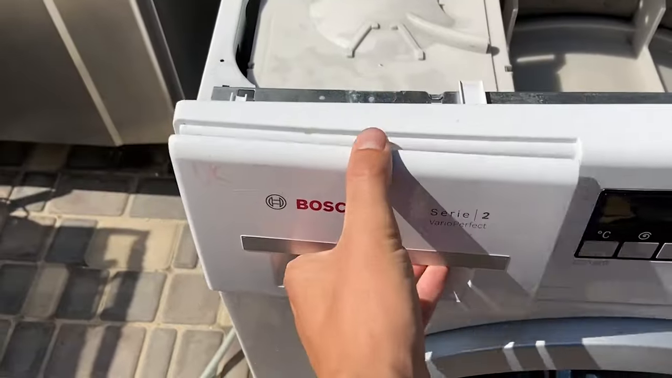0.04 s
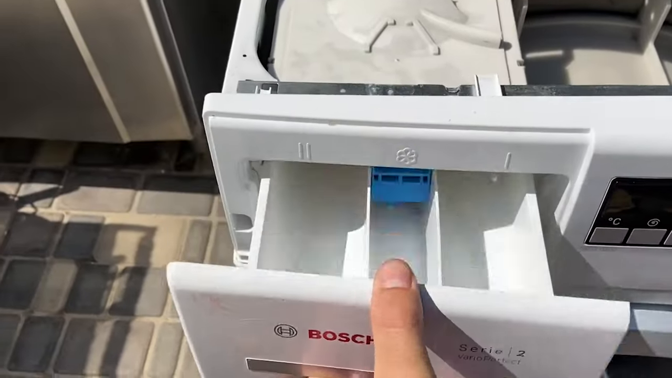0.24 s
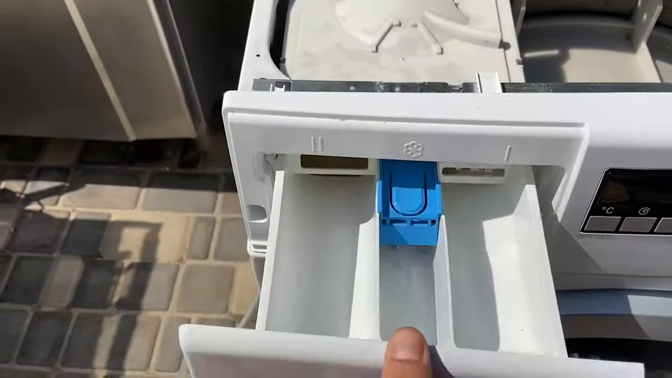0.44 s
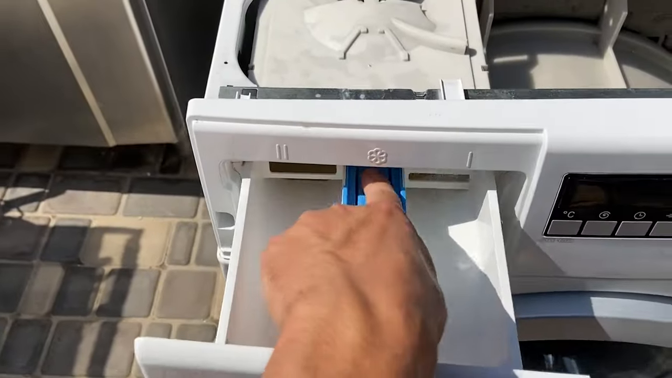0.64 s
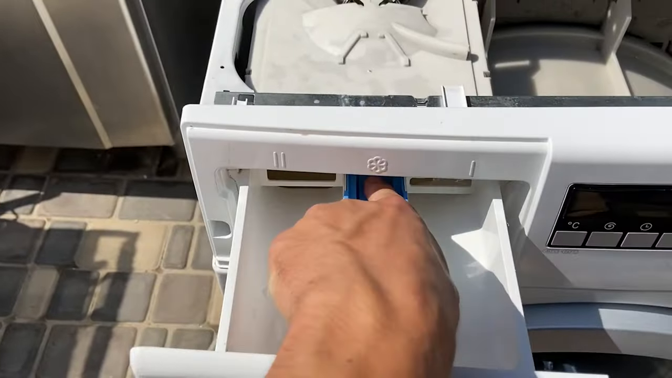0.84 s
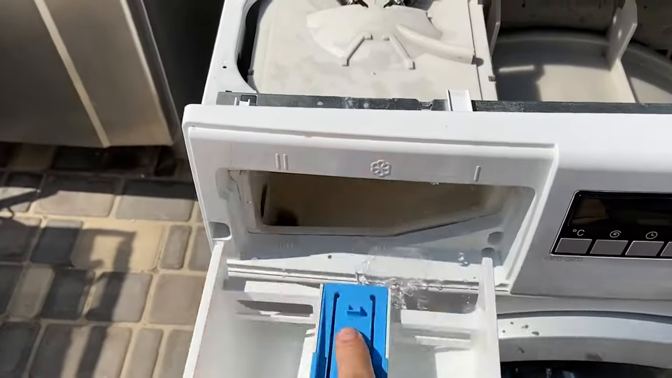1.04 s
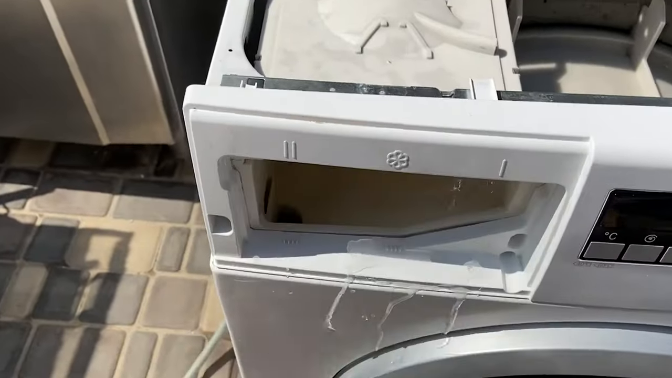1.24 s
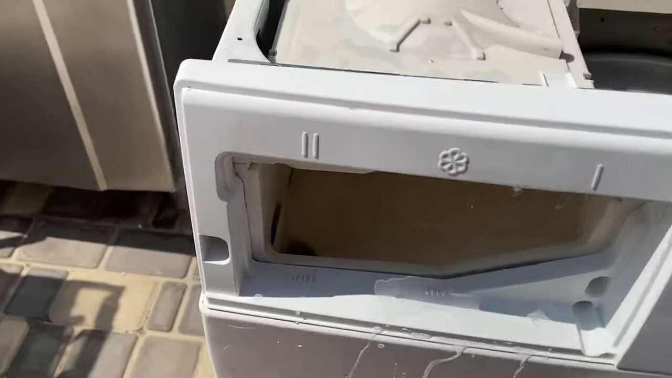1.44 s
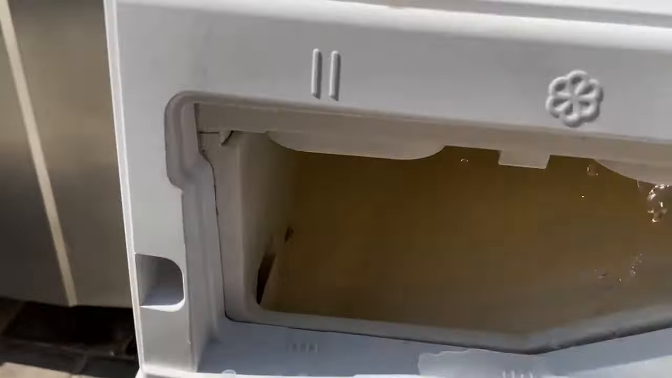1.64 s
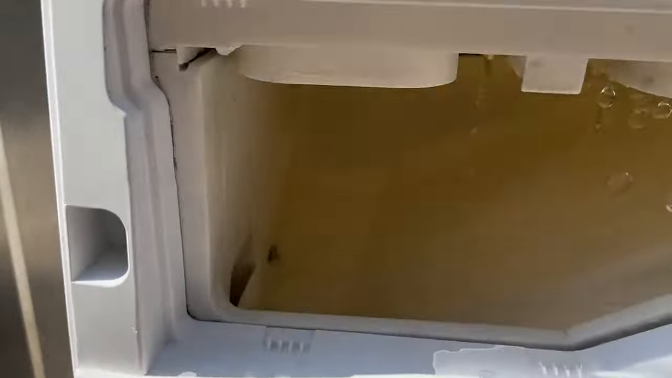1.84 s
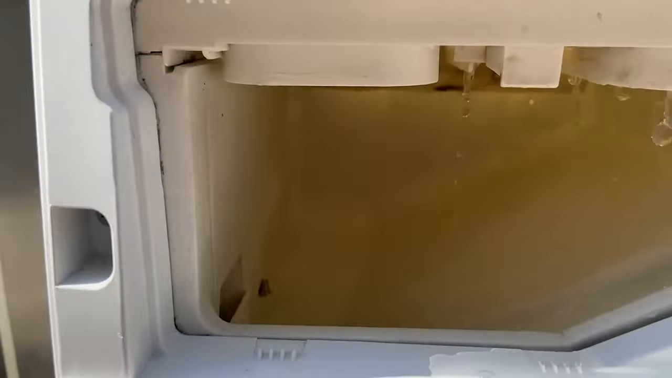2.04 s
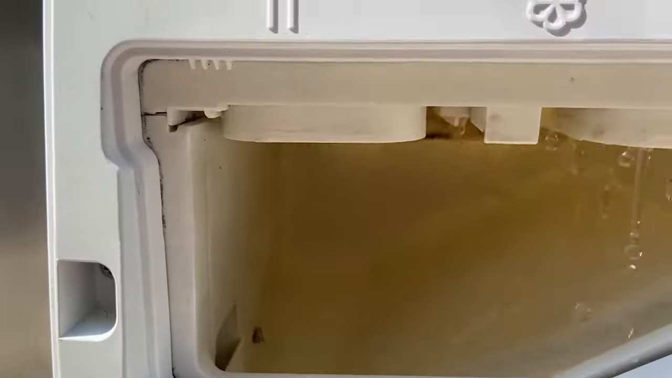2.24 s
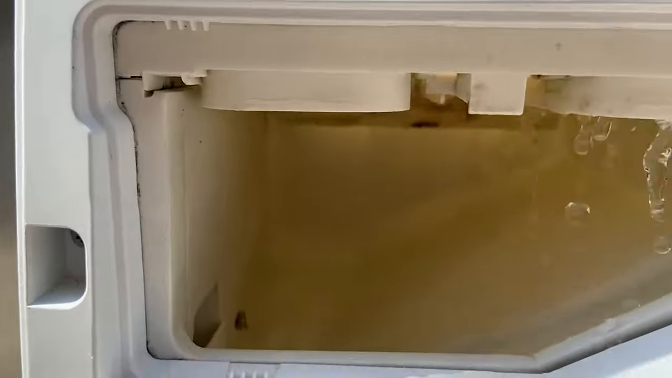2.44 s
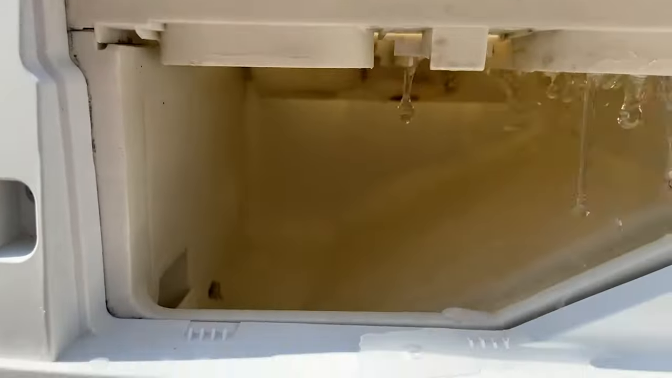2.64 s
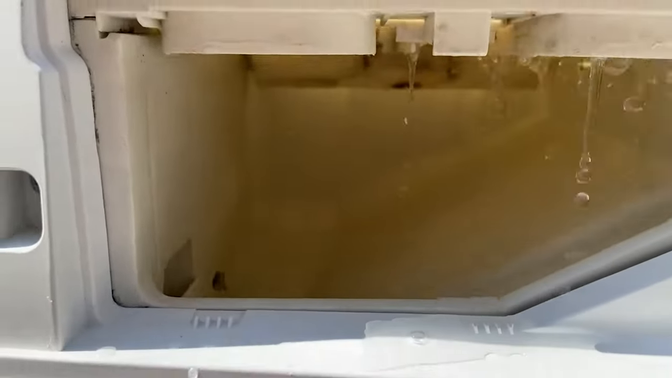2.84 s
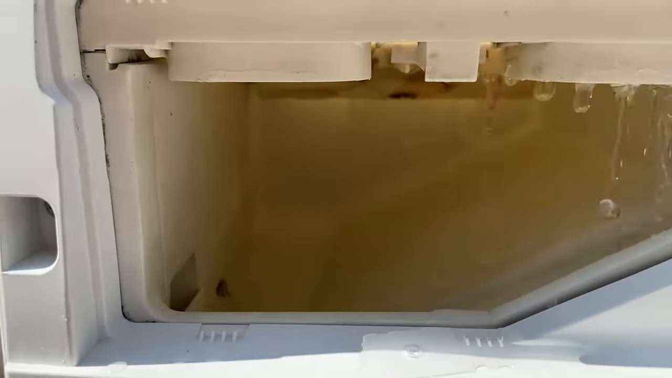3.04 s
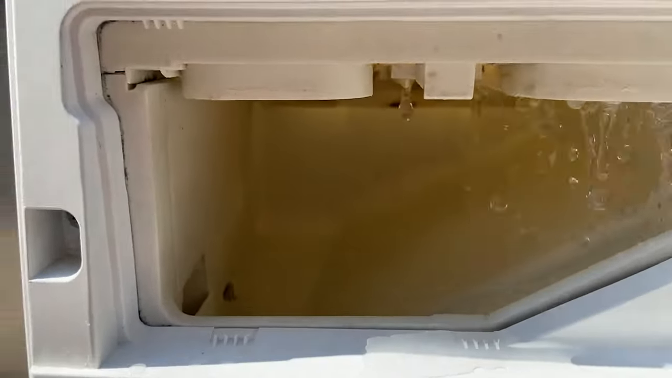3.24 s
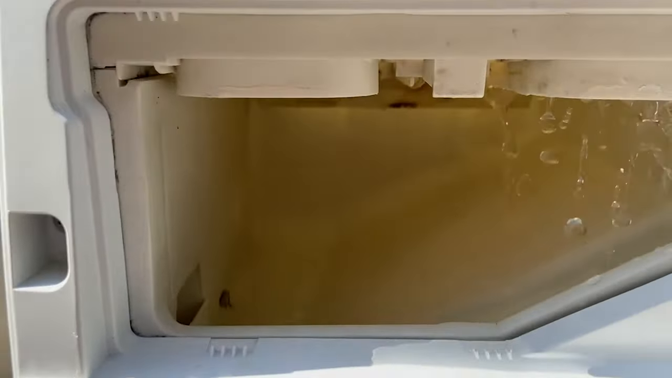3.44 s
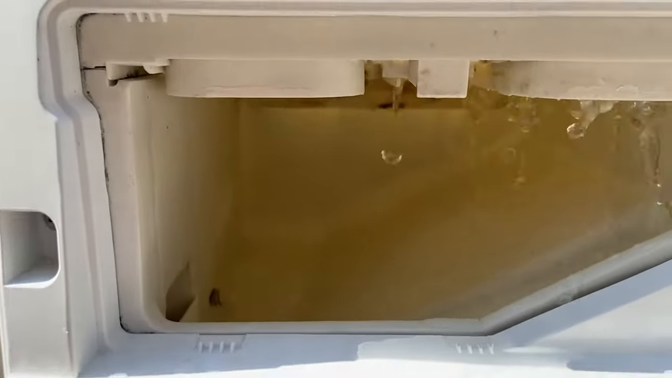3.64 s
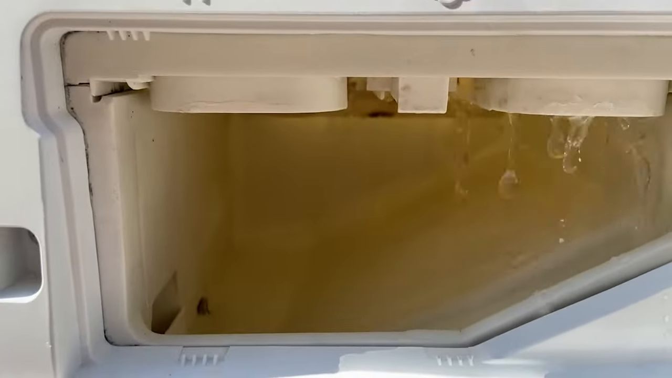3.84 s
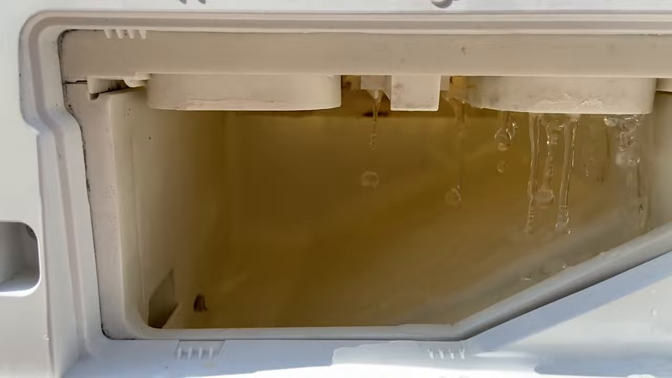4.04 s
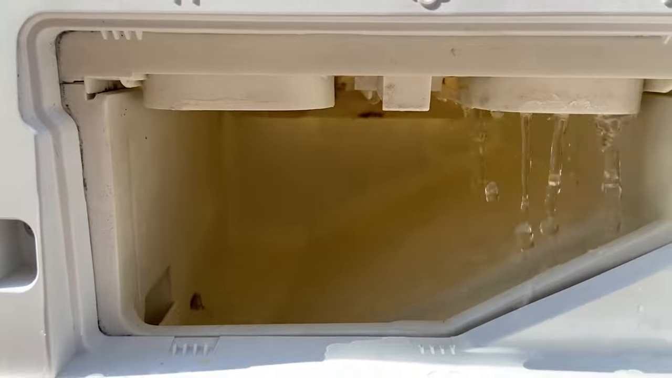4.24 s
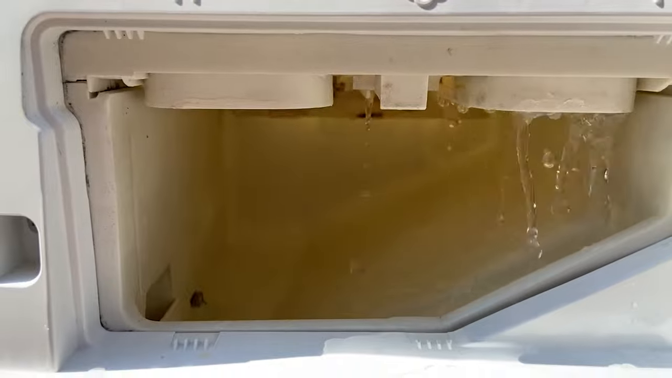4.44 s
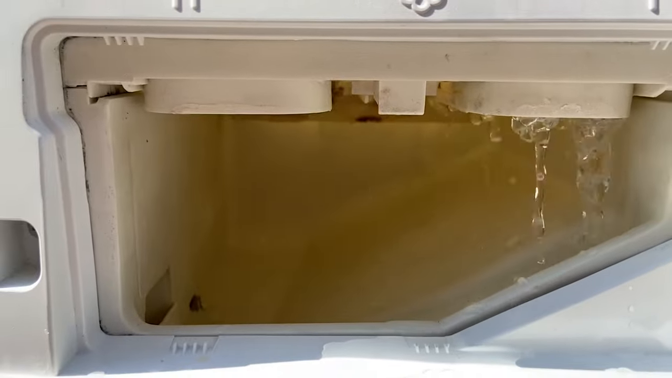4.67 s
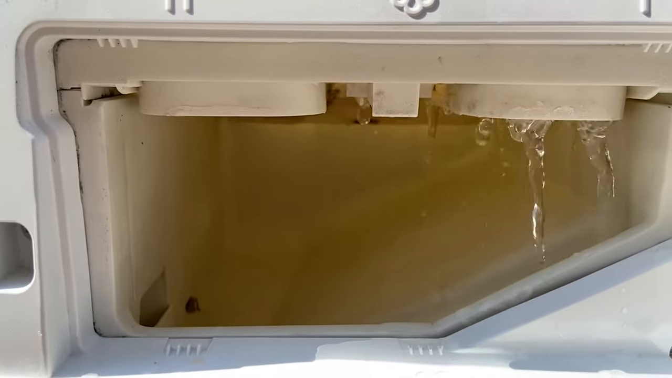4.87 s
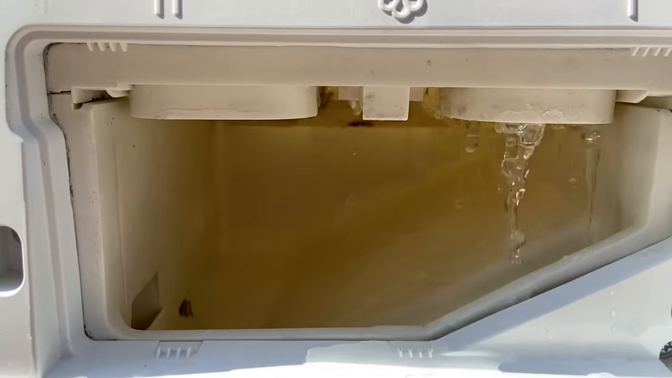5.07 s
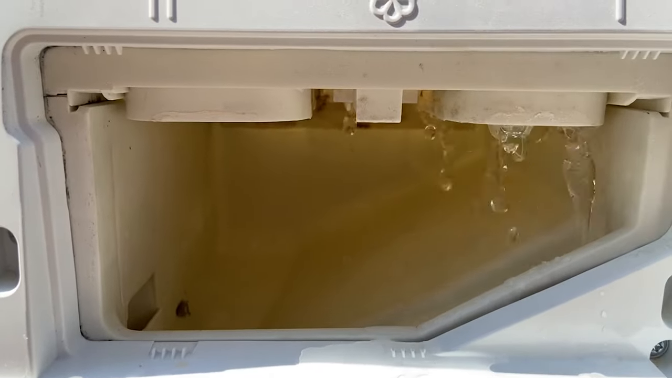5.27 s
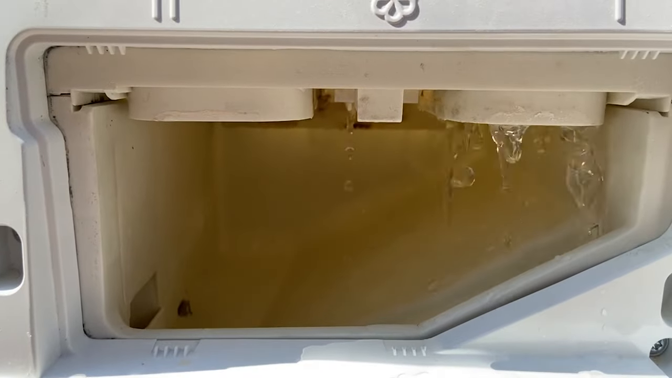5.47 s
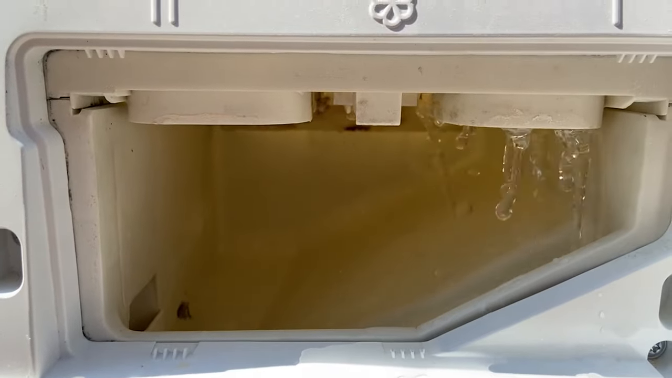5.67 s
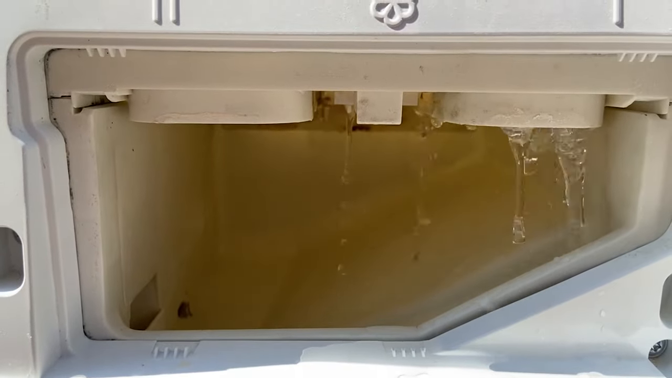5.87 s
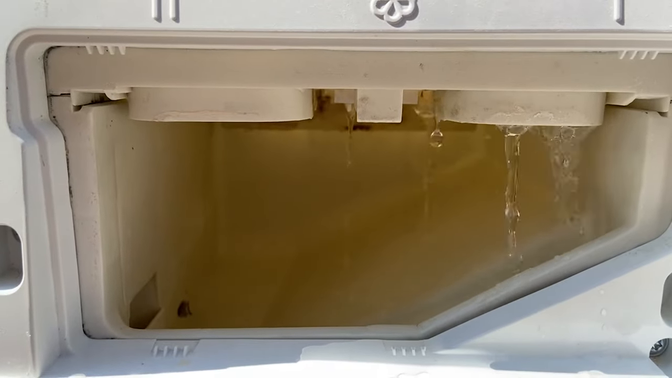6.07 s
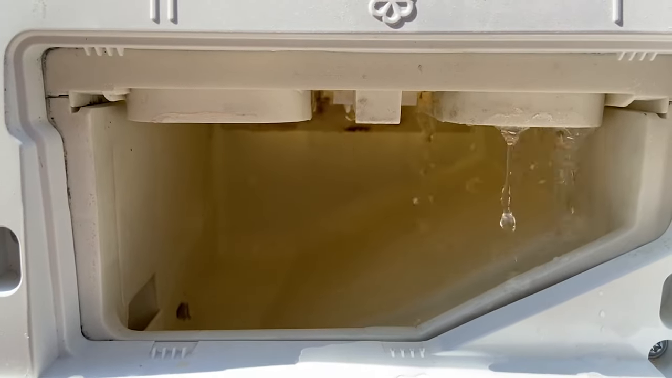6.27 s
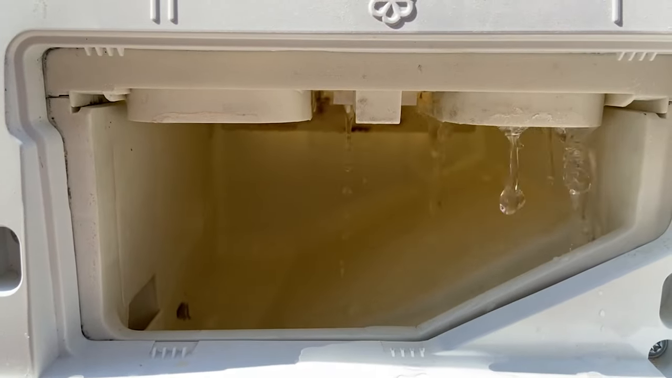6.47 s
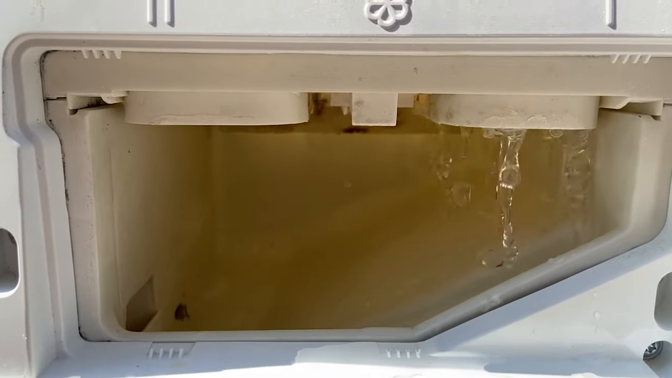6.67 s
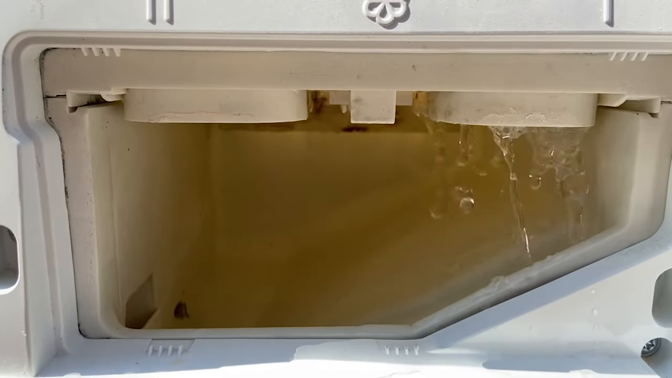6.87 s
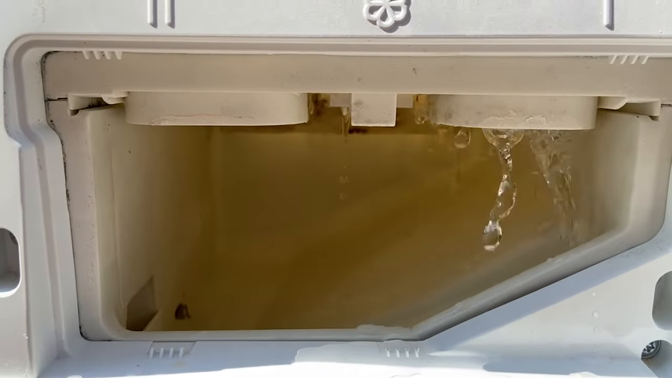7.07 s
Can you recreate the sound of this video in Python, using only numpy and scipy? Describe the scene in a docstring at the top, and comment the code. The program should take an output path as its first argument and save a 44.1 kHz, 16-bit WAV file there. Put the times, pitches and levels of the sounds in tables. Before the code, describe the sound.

A plastic washing machine drawer slides out with clacks, then water dribbles and plinks steadily into its hollow plastic housing.

```python
"""In a yard, a washing machine's soap drawer is pulled to its stop, unlatched and drawn out: plastic
rubs, squeaks and clacks. Water dribbles from the inlet nozzles into the empty plastic housing, where
drops tap the floor, throw spray and trap bubbles. The housing's ring shifts in pitch and colour at about
3.5-4 s. Low thumps and rasps of handling and wind sound on the microphone. Water and drawer are spread
wide by phase offsets between left and right."""
import sys
import numpy as np
from scipy import signal
from scipy.fft import rfft, irfft, next_fast_len
from scipy.io import wavfile
from scipy.ndimage import uniform_filter1d, map_coordinates

SR = 44100
rng = np.random.default_rng(int(sys.argv[2]) if len(sys.argv) > 2 else 0)


def transcribe(signal):
    """Save signal, clipped to [-1, 1], as a 16-bit WAV file at the path in sys.argv[1]."""
    frames = np.atleast_2d(signal).T
    limited = np.clip(frames, -1, 1)
    pcm = np.round(limited * 32767).astype(np.int16)
    wavfile.write(sys.argv[1], SR, pcm)


N = 313551

# Colours of wind and handling noise, low rumble and rasp: f/Hz, level/dB
BUFFET_EQ = [(15, -29), (25, -4.5), (65, 8.5), (118, -2.5), (151, -10.5), (325, -7), (400, -63), (520, -52),
             (880, -120)]
RASP_EQ = [(100, -17), (200, 6.5), (400, -9.5), (800, 0), (1500, -6.5), (2400, -17), (4000, -62)]
# Breeze bed: t/s, level/dB
BREEZE_LEVEL = [(0, -53.5), (0.9, -49), (1.35, -54.5), (1.7, -58), (2.6, -59), (3.3, -51.5), (4.3, -65),
                (4.6, -58), (4.95, -79), (5.45, -52.5), (6.0, -56), (6.3, -46.5), (7.11, -52.5)]
# Bumps of handling and wind: t/s, level/dB, hold/s, rasp over buffet/dB
MIC_BUMPS = [(0.09, -47, 0.06, -30), (0.384, -38, 0.036, -20), (0.636, -45, 0.03, -20),
             (0.717, -49, .01, -14), (0.773, -48, 0.017, -6), (1.053, -47, .03, -32),
             (1.505, -39.5, 0.014, -14), (1.55, -41, 0.034, -21), (1.572, -52, 0.03, -18),
             (1.746, -45, 0.011, -30), (2.76, -44.5, 0.02, -4), (2.863, -40, 0.012, -4),
             (2.945, -39, 0.015, -12), (2.992, -37, 0.022, -28), (3.037, -44, 0.016, -8),
             (3.064, -34.5, 0.015, 0.5), (3.072, -38, 0.02, -10), (3.09, -46, 0.013, -5),
             (3.174, -36, .04, -20), (3.406, -49, .01, -30), (3.852, -49, 0.014, -30), (4.1, -51, .02, -30),
             (4.727, -42.5, 0.032, -30), (6.68, -36, 0.035, -27), (6.741, -48, 0.04, -18),
             (6.82, -51, 0.13, -24)]
# Low thumps within the bumps: t/s, level/dB, final f/Hz
MIC_THUMPS = [(0.623, -32.5, 64.5), (0.78, -21.5, 55), (1.499, -25, 74), (1.555, -39, 74),
              (2.861, -28.5, 69.4), (2.94, -33, 58), (2.991, -34, 74), (3.031, -19.5, 75.5),
              (3.08, -34, 60.6), (3.098, -19, 89.5), (3.853, -34, 85), (6.674, -34, 49), (6.731, -27, 52.4),
              (6.781, -29.5, 49.3), (6.82, -33, 58)]
# Water bed: t/s, splash/dB, spray/dB, hollow boom/dB
WATER_LEVELS = [(0.0, -56, -57, -51), (0.14, -51, -63, -43.5), (0.26, -56, -54, -48.5),
                (0.47, -49.5, -54, -41), (0.67, -58.5, -55.5, -51), (1.09, -51, -50, -45),
                (1.25, -50.5, -50.5, -55), (1.45, -56, -51.5, -53), (1.72, -48.5, -45, -43.5),
                (1.86, -44.5, -45.5, -44), (2.5, -45, -46, -43), (3.15, -44.5, -48, -45),
                (3.82, -47, -45.5, -47), (4.16, -43.5, -47.5, -45), (4.43, -45, -46.5, -45),
                (4.91, -46.5, -46.5, -43.5), (5.3, -44.5, -47.5, -46.5), (6.04, -45, -47.5, -44.5),
                (7.11, -45, -47.5, -46)]
# Housing modes: main ring, early ring and low hollow air: f/Hz, width/Hz, level/dB
MAIN_MODES = [(1004, 121, -2.5), (1462, 20, -4), (1972, 180, -7.5), (2255, 93, -4), (2763, 113, -12.5),
              (3454, 94, -8.5), (4170, 240, -17), (6850, 150, -7)]
EARLY_MODES = [(1108, 75, 9.5), (1530, 37, 9), (2220, 170, -10), (2660, 92, -5), (2994, 66, 3.5),
               (3530, 59, -28), (4370, 76, -23)]
AIR_MODES = [(91.4, 2.7, -4), (156.8, 19, 1), (292.4, 23.6, -2.5), (367.3, 48.6, -3)]
# Crossfade between the two rings: t/s, main ring's share/0-1
RING_MIX = [(0, 0.56), (3.4, 0.67), (4, 0.99), (7.11, 0.94)]
# Spray colour: f/Hz, level/dB
SPRAY_EQ = [(400, -108), (1500, 5), (3000, -6.5), (4500, -2.5), (5500, -11), (6500, -2), (8000, -7),
            (9500, -3.5), (11500, -9)]
# Featured drops: t/s, bubble level/dB, bubble f/Hz, tap trim/dB
LOUD_DROPS = [(1.132, -18, 1163, -8), (1.197, -15.5, 887, -17), (1.451, -30, 775, 5),
              (1.7417, -28.5, 4620, -20), (1.792, -19, 2200, -8), (1.907, -20.5, 1050, 9.5),
              (1.9376, -32, 3960, -14), (1.9624, -28, 3970, -19), (2.011, -27, 2070, -6),
              (2.047, -21.5, 1120, 6), (2.05, -17, 1180, -18), (2.063, -13, 1175, -17),
              (2.088, -28, 1070, -6), (2.106, -19.5, 2660, -12), (2.155, -27, 1170, 7),
              (2.197, -20, 1120, -2), (2.2184, -31, 3570, -10), (2.307, -14.5, 1110, -0.5),
              (2.4748, -31, 6300, -10), (2.49, -25, 3340, -16), (2.531, -15.5, 930, -4),
              (2.578, -28, 2720, 1), (2.664, -15.5, 1660, -6), (2.689, -20.5, 1130, 10),
              (2.711, -11, 960, -18), (2.717, -20, 975, -18), (2.751, -16.5, 1000, -11),
              (2.85, -20, 1260, 0.4), (2.9647, -32, 2900, -8), (3.064, -20.5, 1200, 5),
              (3.074, -9, 745, -4.5), (3.139, -20, 1560, -9), (3.1763, -16.5, 1170, 5),
              (3.208, -14, 1170, -18), (3.227, -15, 1200, -7), (3.268, -7, 1060, -4.5),
              (3.323, -21, 1420, -7), (3.346, -23, 2130, -6), (3.485, -21, 990, -0.5),
              (3.532, -25, 2220, -14), (3.591, -30, 6300, -6), (3.661, -20.5, 960, -1),
              (3.712, -24.5, 1490, 3.5), (3.7935, -27.5, 4780, -3), (4.045, -21, 2100, -5),
              (4.061, -17, 1070, -7), (4.111, -22, 1170, 8.5), (4.1635, -22, 1780, 6.5),
              (4.199, -24.5, 1010, 3), (4.222, -22.5, 1000, 1), (4.2428, -28, 4330, -4),
              (4.264, -11.5, 980, -22), (4.275, -12, 976, -12), (4.2884, -28, 7100, -12),
              (4.311, -16.5, 1040, -19), (4.396, -21, 1070, -17), (4.471, -22.5, 1110, 3.5),
              (4.489, -27, 1880, 1.5), (4.5312, -30, 3690, 1), (4.5919, -30, 5600, 4.5),
              (4.639, -20, 940, -2), (4.706, -21, 1040, -3), (4.726, -24, 1020, 4),
              (4.762, -16, 1000, -1.5), (4.806, -17, 1010, -7), (4.835, -16.5, 1020, -10),
              (4.884, -20.5, 1020, -19), (4.909, -25, 1070, -7), (5.053, -23, 960, -18),
              (5.113, -23, 1070, -10), (5.161, -20, 1460, -7), (5.195, -28, 2220, 4),
              (5.2267, -24.5, 3680, -16), (5.3771, -28, 6130, -3), (5.506, -10.5, 1080, -5.5),
              (5.5324, -29, 4600, -8), (5.6425, -15.5, 1030, -4), (5.676, -17, 1000, -2.5),
              (5.686, -19, 2120, -16), (5.754, -22, 2750, -10), (5.7963, -28.5, 4370, -3),
              (5.857, -27, 2200, 3), (5.886, -18, 1060, -14), (5.941, -21, 1450, -5),
              (5.9709, -26, 2750, -9), (6.1171, -28, 3360, -3), (6.136, -15, 1050, -9),
              (6.2535, -22, 2140, -0.5), (6.318, -36, 1080, -11), (6.444, -13.5, 1020, -6),
              (6.5127, -30.5, 6370, -11), (6.568, -15, 1060, -17), (6.588, -21, 1080, -14),
              (6.639, -33, 1060, -8), (6.6472, -24.5, 6760, -10), (6.655, -16, 1010, -5),
              (6.688, -22, 1110, 7), (6.724, -31, 1050, 0), (6.742, -14, 1046, -1.5),
              (6.771, -24, 1040, -4), (6.786, -18.5, 1060, -11), (6.853, -21.5, 1090, -3),
              (7.0205, -35, 2740, -8), (7.053, -17, 1990, -8.5), (7.083, -23.5, 1990, 3)]
# Strokes of the drawer on its rails: t/s, level/dB, hold/s
STROKES = [(0.062, -43, 0.0094), (0.116, -51.5, 0.067), (0.219, -43, 0.1), (0.915, -50, 0.012),
           (0.938, -41.5, 0.022), (1.003, -43, 0.006), (1.306, -47.5, 0.084), (1.456, -40, 0.033)]
# Rubbing colour: f/Hz, level/dB
RUB_EQ = [(200, -33), (600, 6), (1300, 2), (2500, -1.5), (3200, -1.5), (3650, -2.5), (4200, -2), (5000, -5),
          (8000, -5), (12500, -12)]
# Rail squeaks: t/s, level/dB, hold/s, f/Hz
RAIL_SQUEAKS = [(0.934, -50, 0.016, 3150), (0.935, -46, 0.004, 4100), (0.95, -50, 0.008, 4200)]
# Modes of the plastic drawer: f/Hz, width/Hz, level/dB
DRAWER_MODES = [(140.4, 11, 0.5), (230, 91, -5), (264, 51, -2), (375, 63, -3), (483, 130, -5),
                (706, 134, 2.5), (874, 85, 3.5), (1194, 135, 5), (1840, 710, -3.5), (3010, 300, -3.5),
                (3620, 370, -3.5), (6200, 1700, -11)]
# Drawer hits: t/s, relative level/dB, thud trim/dB, crack trim/dB, blow f/Hz
DRAWER_KNOCKS = [(0.047, -40, -3.5, -15, 1100), (0.0623, -27, -8.5, -28, 500),
                 (0.069, -27.5, -1.5, -20, 1200), (0.092, -35, -4, -20, 1000),
                 (0.339, -0.5, -20, -14.5, 1256), (0.3433, -2.5, -24.5, -1, 3520),
                 (0.348, -11, -12.5, -4, 1190), (0.355, -24, -1, -16, 680), (0.376, -33, 2.5, -20, 700),
                 (0.452, -32, -7, -19, 1550), (0.492, -35, -3, -25, 746), (0.558, -22, -30, -3.5, 4570),
                 (0.561, -23, -20, -7.5, 1230), (0.587, -27.5, -15, -18, 1600),
                 (0.628, -47.5, -13, 5, 1000), (1.013, -20.5, -24, -6.5, 1150),
                 (1.0145, -20.5, -20, -14, 1280), (1.017, -26, -25, -22, 624), (1.45, -41, -13, -8, 795)]
# Stereo phase between left and right, opposed at 8.3-9.6 kHz, hollowing the centre: f/Hz, phase/rad
STEREO_PHASE = [(30, 0), (400, .2), (900, .9), (1450, 1.1), (1750, 3.3), (2250, 6.4), (2900, 7),
                (3400, 6.28), (7600, 6.28), (8300, 3.14), (9600, 3.14), (10400, 0)]
# Left over right: f/Hz, level/dB
LEFT_TILT = [(60, 0), (400, 2), (900, 5.5), (1500, 3.5), (2400, 2.5), (4000, 2.2), (6000, 1.2), (7500, 0),
             (11300, 0), (12400, -7)]
# Diffuse, random-phase stereo width, nearly absent above 8.5 kHz: f/Hz, level/dB
WIDTH_EQ = [(60, -22), (300, -9), (900, -6.5), (1700, 2.5), (3600, -6.5), (5400, 4), (7000, -5), (8000, 5),
            (8500, -17.5), (9500, -56), (10000, -25), (10500, -30), (11300, -48), (12000, -37)]

BUMP_SLOPES, SLIDE_SLOPES = (730, 300), (800, 440)  # rise, fall in dB/s
THUMP_PEAK, THUMP_LIFT, THUMP_SAG = 0.84, 0.61, 0.47  # cycles: to the peak, gained early, of pitch sag
BUBBLE_T60, BUBBLE_SHRINK, BUBBLE_ATTACK = 0.023, 0.13, 7.3  # s at 1 kHz, pitch exponent, cycles
SMALL_FROM_S, SMALL_DB, SMALL_HZ, SMALL_LOG_SPREAD = 1.7, -39.5, 1788, 0.67  # filler drops
SLAP_DB = -5  # how hard a drop's tap rings the housing
CEILING, TOP_HZ = 0.93, 11800


def amp(db):
    """dB to gain."""
    return 10 ** (np.asarray(db) / 20)


def unit(x):
    """Scaled to rms 1."""
    return x / np.sqrt(np.mean(x ** 2) + 1e-20)


def along(points, hz):
    """Reads (f/Hz, value) points on a log axis."""
    f, v = np.transpose(points)
    return np.interp(np.log(hz + 1), np.log(f + 1), v)


def curves(rows):
    """One automation curve for each column after the time."""
    s, *cols = np.transpose(rows)
    return [np.interp(np.arange(N) / SR, s, c) for c in cols]


def wobble(rate):
    """A smooth random curve, rate knots a second."""
    return map_coordinates(rng.standard_normal(int(N * rate / SR) + 4), [np.arange(N) * rate / SR])


def swells(s, db, hold, rise, fall):
    """Summed envelopes that climb to their level at s, hold and sink, straight in dB."""
    grid = np.arange(0, N, 32)
    t = grid / SR - s[:, None]
    level = db[:, None] + rise * np.minimum(t, 0) - fall * np.maximum(t - hold[:, None], 0)
    return np.interp(np.arange(N), grid, amp(level).sum(0))


def filtered(x, response):
    """x through a complex frequency response."""
    m = next_fast_len(N + SR // 2)
    return irfft(rfft(x, m) * response(np.fft.rfftfreq(m, 1 / SR)), m)[..., :N]


def eq(x, points):
    """x through a curve of (f/Hz, level/dB) points."""
    return filtered(x, lambda hz: amp(along(points, hz)))


def resonances(modes):
    """Response of a resonator bank with alternating polarity."""
    return lambda f: sum((-1) ** k * amp(db) * 1j * f * w / (c * c - f * f + 1j * f * w)
                         for k, (c, w, db) in enumerate(modes))


def hiss(flutter_db, rate, colour=((30, 0), (12000, 0))):
    """Fluttering noise of rms 1, white unless given a colour."""
    noise = eq(rng.standard_normal(N), colour)
    return unit(noise * amp(flutter_db * wobble(rate)))


def placed(s, rows):
    """Rows of samples summed at their start times."""
    at = (s * SR).astype(int)[:, None] + np.arange(rows.shape[1])
    return np.bincount(at.ravel(), rows.ravel(), N + SR)[:N]


def splats(s, gain, t60):
    """Noise bursts with a snappy attack."""
    t = np.arange(SR // 30) / SR
    envelope = amp(-60 * t / t60) * (1 - np.exp(-t / 0.00013))
    return placed(s, gain[:, None] * envelope * rng.standard_normal((len(s), len(t))))


def pings(s, hz, gain, t60, rise, attack):
    """Damped sines; the pitch may climb, like a bubble nearing the surface."""
    t = np.arange(SR // 25) / SR
    age = t / t60[:, None]
    tone = np.sin(2 * np.pi * hz[:, None] * t * (1 + rise * age))
    envelope = amp(-60 * age) * (1 - np.exp(-t / attack))
    return placed(s, gain[:, None] * envelope * tone)


def patchy(x, depth_db=4.0):
    """Gives each burst its own colour: random gain in patches of frequency and time."""
    z = signal.stft(x, nperseg=256)[2]
    field = uniform_filter1d(rng.standard_normal(z.shape), size=9, axis=0)
    field = uniform_filter1d(field, size=7, axis=1)
    return signal.istft(z * amp(depth_db * unit(field)), nperseg=256)[1][:N]


def mic_thumps():
    """Low thumps of handling and wind: a few bass cycles that sag in pitch."""
    s, db, hz = np.transpose(MIC_THUMPS)
    cycles = hz[:, None] * np.arange(SR // 10) / SR
    phase = cycles + THUMP_LIFT * (1 - np.exp(-cycles / THUMP_SAG))
    envelope = (cycles / THUMP_PEAK * np.exp(1 - cycles / THUMP_PEAK)) ** 2
    return placed(s, -amp(db)[:, None] * envelope * np.sin(2 * np.pi * phase))


def wind_and_handling():
    """Handling and wind rumble, rasp and thump on the microphone; the rumble has a little width."""
    s, db, hold, rasp_db = np.transpose(MIC_BUMPS)
    mid = hiss(flutter_db=3.5, rate=15, colour=BUFFET_EQ)
    side = amp(-10.5) * hiss(flutter_db=7.0, rate=15, colour=BUFFET_EQ)
    breeze = amp(curves(BREEZE_LEVEL)[0] + 0.78 * wobble(27))
    bumps = swells(s, db, hold, *BUMP_SLOPES)
    rasp = swells(s, db + rasp_db, hold, *BUMP_SLOPES) * hiss(flutter_db=3.5, rate=90, colour=RASP_EQ)
    return (breeze + bumps) * np.array([mid + side, mid - side]) + rasp + mic_thumps()


def patter(count, size_db, t60):
    """Random drops burst on plastic over a fluttering rush; size_db spreads their levels."""
    when, size = rng.random((count, 2)).T
    bursts = splats(when * N / SR, amp(-size_db * np.log(size + 0.022)), t60)
    return unit(unit(patchy(bursts)) + 1.29 * hiss(flutter_db=3.5, rate=65))


def tinkle(count, mid_hz, spread, cycles, size_db):
    """Tiny droplets tick at random times and high pitches."""
    when, size = rng.random((count, 2)).T
    hz = np.clip(mid_hz * np.exp(spread * rng.standard_normal(count)), 2400, 11000)
    gain = amp(-size_db * np.log(size + 0.036))
    return unit(pings(when * N / SR, hz, gain, cycles / hz, rise=0.083, attack=0.000074))


def housing_ring(impacts, modes):
    """Impacts ring the housing, with its peaks sharpened and the valleys kept dark."""
    box = resonances(modes)
    return unit(filtered(impacts, lambda hz: box(hz) * (abs(box(hz)) ** 0.5 + amp(-14))))


def dribble():
    """Streams break up on the housing floor: ringing splash, fine spray and a hollow boom."""
    splash_db, spray_db, boom_db = curves(WATER_LEVELS)
    mix = curves(RING_MIX)[0]
    impacts = patter(count=1400, size_db=-0.5, t60=0.044)
    main = np.sqrt(mix) * housing_ring(impacts, MAIN_MODES)
    early = np.sqrt(1 - mix) * housing_ring(impacts, EARLY_MODES)
    spatter = unit(patchy(patter(count=600, size_db=4.5, t60=0.047)))
    ticks = tinkle(count=1800, mid_hz=3840, spread=0.383, cycles=45.0, size_db=4.5)
    spray = unit(eq(0.76 * impacts + 1.69 * spatter + 0.57 * ticks, SPRAY_EQ))
    boom = unit(filtered(hiss(flutter_db=3, rate=12), resonances(AIR_MODES)))
    return amp(splash_db) * (main + early) + amp(spray_db) * spray + amp(boom_db) * boom


def small_drops(count):
    """Quiet random filler drops, as rows like LOUD_DROPS."""
    s = SMALL_FROM_S + rng.random(count) * (N / SR - SMALL_FROM_S)
    pitch, level, tap = rng.standard_normal((count, 3)).T
    hz = np.clip(SMALL_HZ * np.exp(SMALL_LOG_SPREAD * pitch), 800, 7500)
    return np.transpose([s, SMALL_DB + 3 * np.minimum(level, 1), hz, -0.4 + 3 * tap])


def drops():
    """Each drop traps a bubble, taps the plastic, throws spray and rings the housing."""
    s, db, hz, tap_db = np.vstack([LOUD_DROPS, small_drops(count=240)]).T
    t60 = BUBBLE_T60 * (1000 / hz) ** BUBBLE_SHRINK  # small bubbles die faster
    bubbles = pings(s, hz, amp(db), t60, rise=0.021, attack=(BUBBLE_ATTACK / hz)[:, None])
    t = np.arange(SR // 100) / SR
    cycles = hz[:, None] * t
    envelope = amp((db + tap_db)[:, None] - 60 * t / 0.0044) * (1 - np.exp(-cycles / 0.27))
    taps = envelope * np.sin(2 * np.pi * 1.31 * cycles)
    spray = eq(splats(s, amp(db + tap_db - 23.0), t60=0.03), SPRAY_EQ)
    mix = np.interp(s, *np.transpose(RING_MIX))[:, None]
    main = filtered(placed(s, np.sqrt(mix) * taps), resonances(MAIN_MODES))
    early = filtered(placed(s, np.sqrt(1 - mix) * taps), resonances(EARLY_MODES))
    return bubbles + amp(-1.0) * placed(s, taps) + spray + amp(SLAP_DB) * (main + early)


def drawer_slide():
    """Plastic drags on plastic: strokes of rubbing noise and wavering squeaks."""
    strokes = swells(*np.transpose(STROKES), *SLIDE_SLOPES)
    sound = strokes * hiss(flutter_db=2.5, rate=66, colour=RUB_EQ)
    for s, db, hold, hz in RAIL_SQUEAKS:
        squeak = np.sin(2 * np.pi * hz * np.arange(N) / SR + 0.9 * wobble(170))
        sound += swells(*np.array([[s], [db], [hold]]), *SLIDE_SLOPES) * squeak
    return sound


def drawer_knocks():
    """A pitched blow and a short rattle drive the drawer's modes; thud below, crack on top."""
    s, db, thud_db, crack_db, blow_hz = np.transpose(DRAWER_KNOCKS)
    body = resonances(DRAWER_MODES)
    low = lambda hz: 1 / (1 + (1j * hz / 450)) ** 2
    rattle = filtered(splats(s, amp(db - 1.5), t60=0.028), lambda hz: body(hz) * (1 - low(hz)))
    blow = pings(s, blow_hz, amp(db - 2.5), t60=16.3 / blow_hz, rise=0, attack=(0.67 / blow_hz)[:, None])
    clack = rattle + filtered(blow, lambda hz: 1.07 + 0.94 * body(hz))
    push = placed(s, amp(db + thud_db + 24.0)[:, None] * np.hanning(SR // 500))  # swings the low modes
    rumble = splats(s, amp(db + thud_db + 22.5), t60=0.061)
    thud = filtered(push + rumble, lambda hz: body(hz) * low(hz))
    crack = filtered(splats(s, amp(db + crack_db - 0.5), t60=0.022), lambda hz: 1 / (1 + 1j * hz / 6000))
    t = np.arange(SR // 4) / SR
    shiver = amp(-60 * t / 0.2) * rng.standard_normal(len(t))  # loose panels shake on after a blow
    tail = signal.fftconvolve(clack + 0.43 * crack + 2.85 * thud, shiver / np.linalg.norm(shiver))[:N]
    return clack + thud + crack + amp(-13.5) * tail


def widen(sound):
    """Left and right are offset in phase and level; a random-phase copy adds diffuse width."""
    left = lambda hz: np.exp(0.5j * along(STEREO_PHASE, hz)) * amp(along(LEFT_TILT, hz) / 2)
    direct = filtered(sound, lambda hz: np.array([left(hz), 1 / left(hz)]))
    z = signal.stft(sound, nperseg=256)[2]
    turns = uniform_filter1d(rng.standard_normal((2,) + z.shape), size=5, axis=2)
    diffuse = signal.istft(z * np.exp(2j * np.pi * turns), nperseg=256)[1][:, :N]
    return direct + eq(diffuse, WIDTH_EQ)


def scene():
    """Water and drawer spread to stereo, with wind and handling on the microphone."""
    return widen(dribble() + drops() + drawer_knocks() + drawer_slide()) + wind_and_handling()


def record(dry):
    """A soft clip rounds the loudest peaks; a steep low-pass trims the top."""
    soft = dry / (1 + abs(dry / CEILING) ** 6) ** (1 / 6)
    return filtered(soft, lambda hz: 1 / (1 + (hz / TOP_HZ) ** 120))


dry = scene()
out = record(dry)
transcribe(out)
```